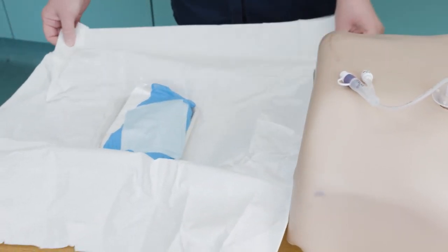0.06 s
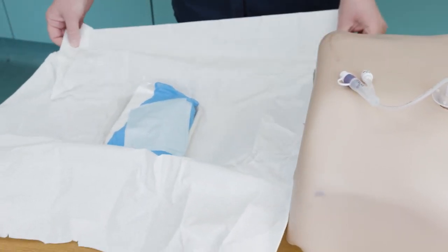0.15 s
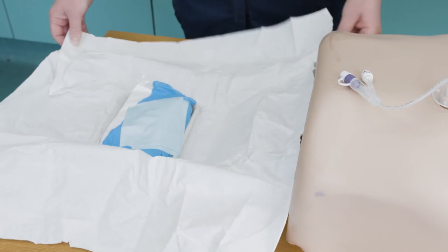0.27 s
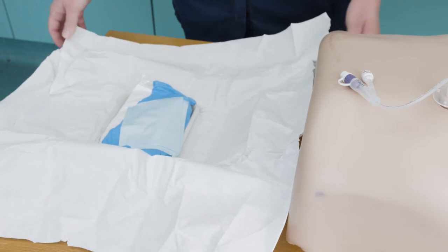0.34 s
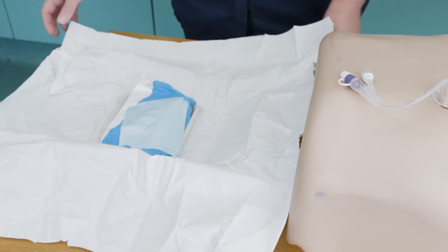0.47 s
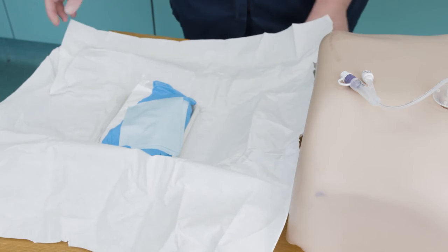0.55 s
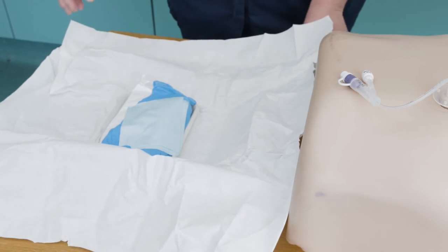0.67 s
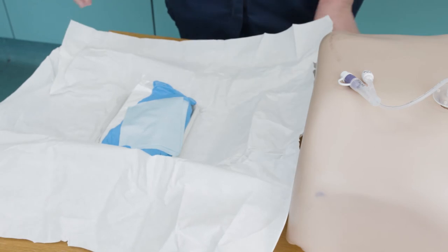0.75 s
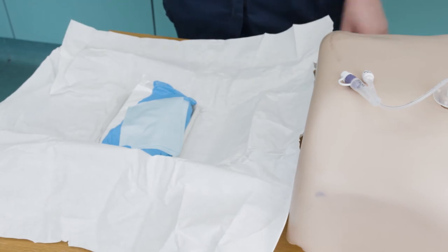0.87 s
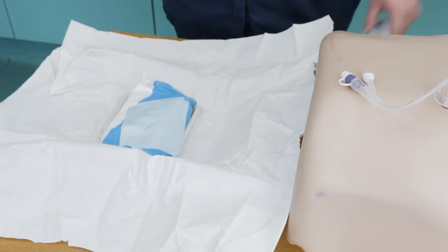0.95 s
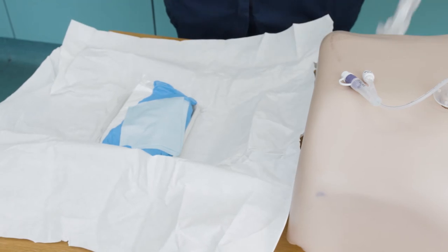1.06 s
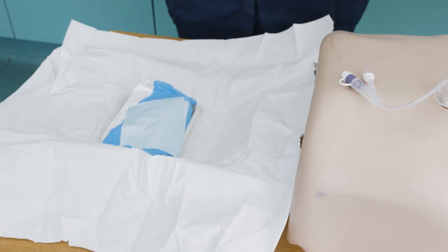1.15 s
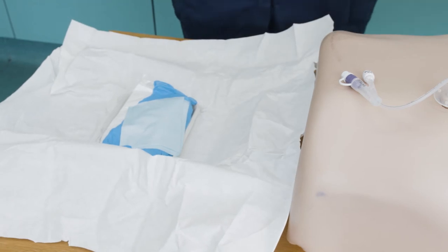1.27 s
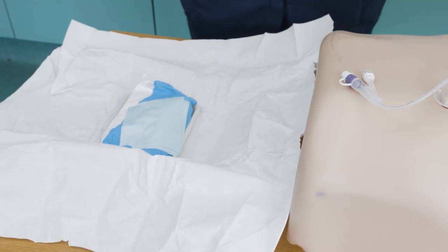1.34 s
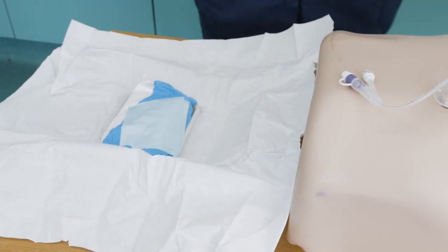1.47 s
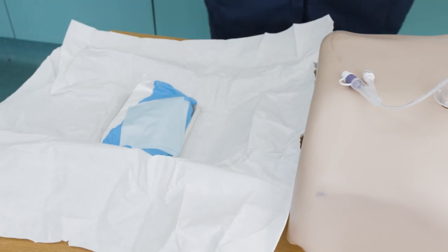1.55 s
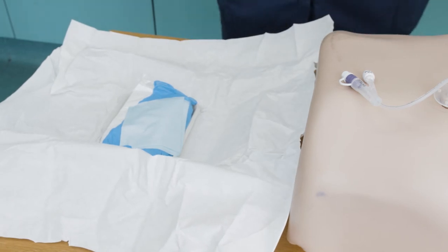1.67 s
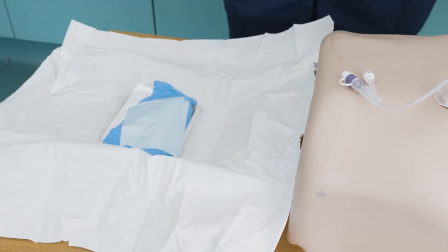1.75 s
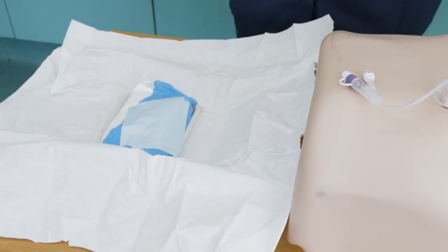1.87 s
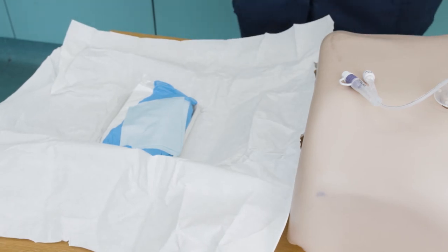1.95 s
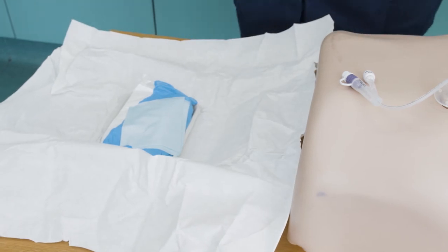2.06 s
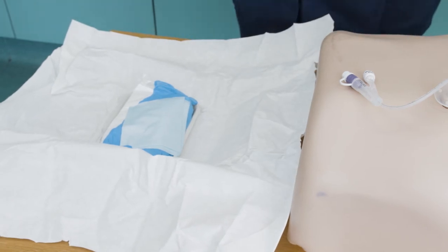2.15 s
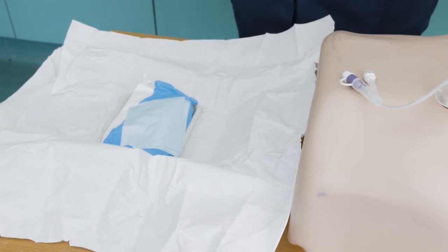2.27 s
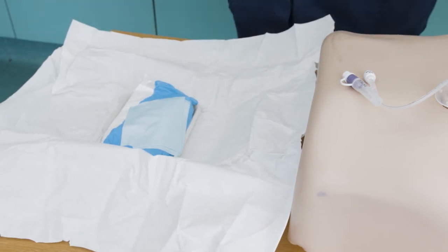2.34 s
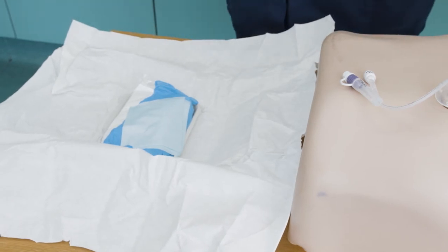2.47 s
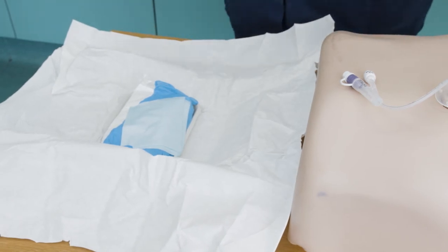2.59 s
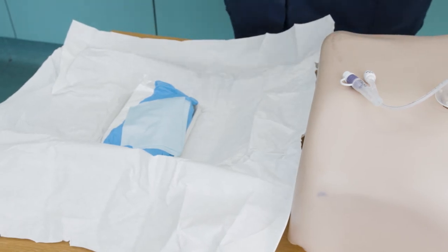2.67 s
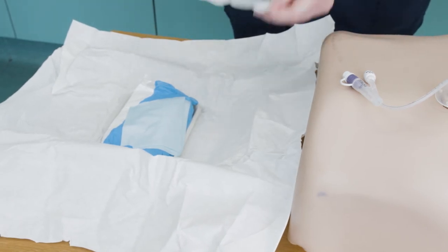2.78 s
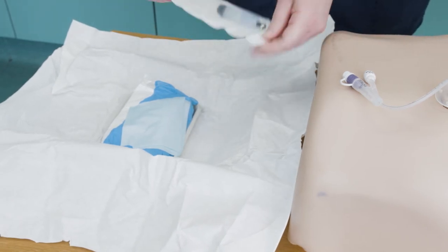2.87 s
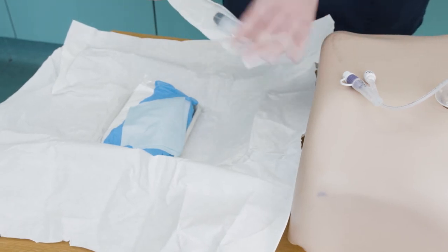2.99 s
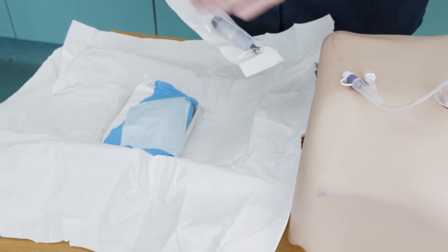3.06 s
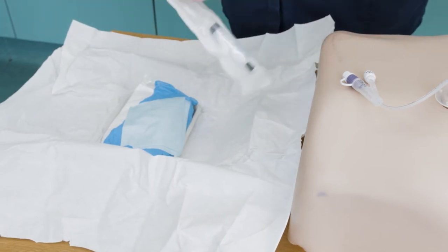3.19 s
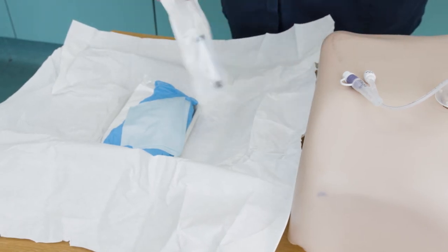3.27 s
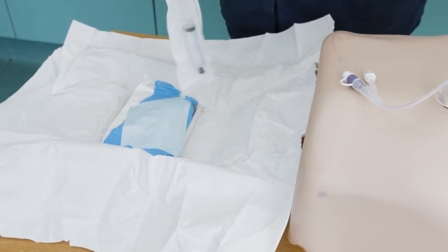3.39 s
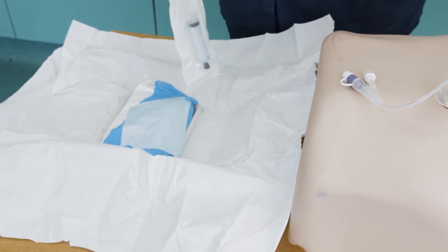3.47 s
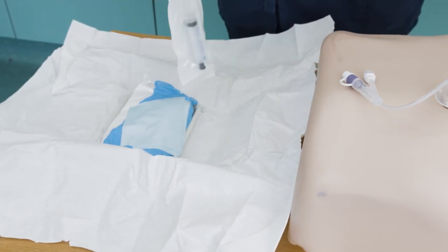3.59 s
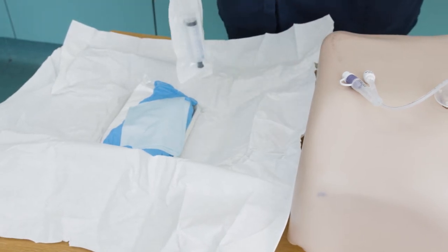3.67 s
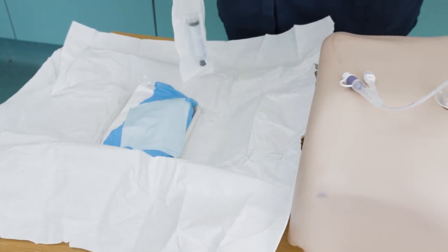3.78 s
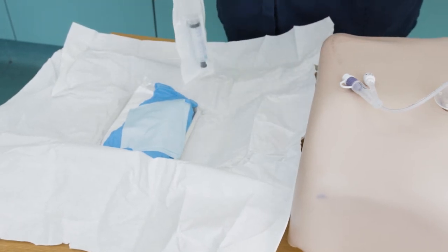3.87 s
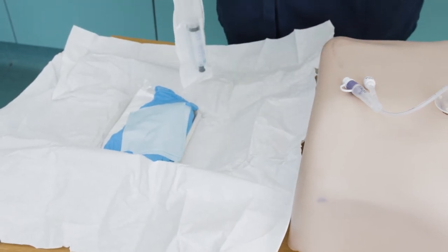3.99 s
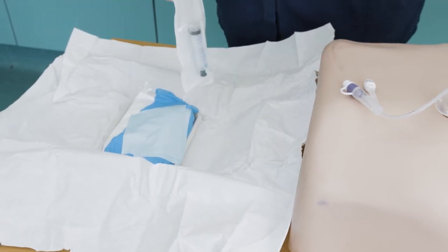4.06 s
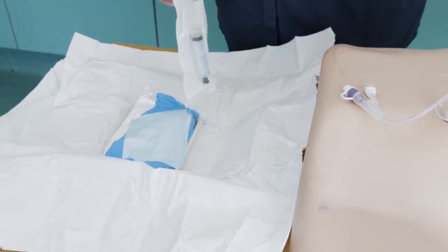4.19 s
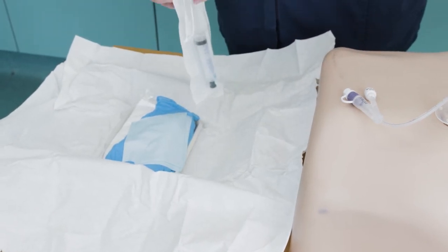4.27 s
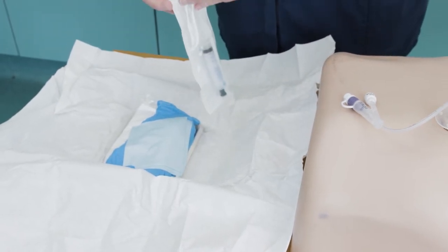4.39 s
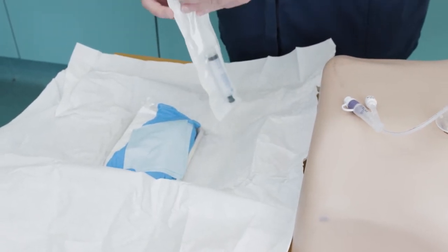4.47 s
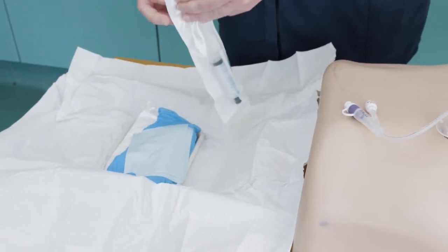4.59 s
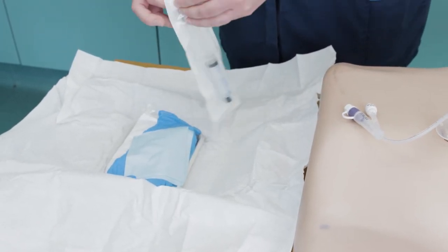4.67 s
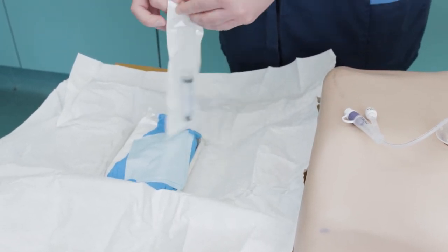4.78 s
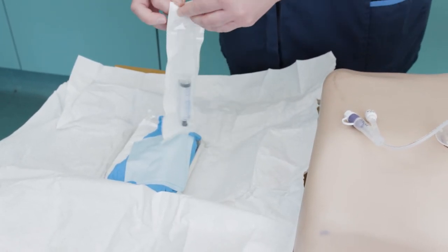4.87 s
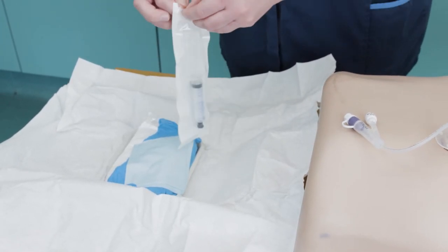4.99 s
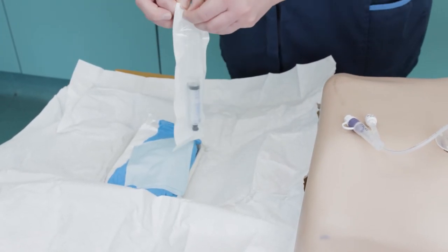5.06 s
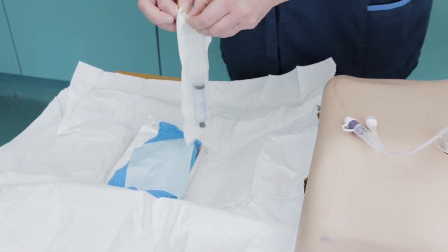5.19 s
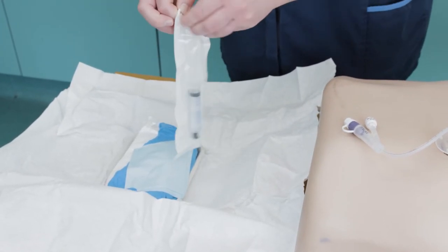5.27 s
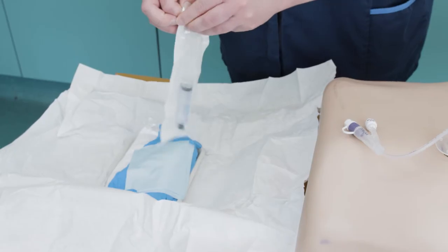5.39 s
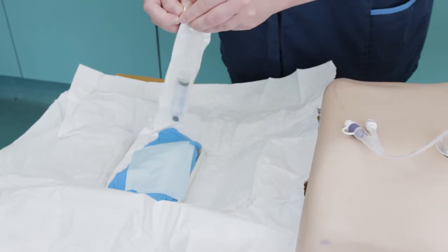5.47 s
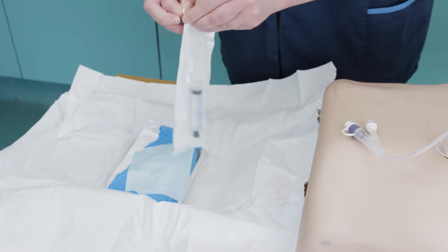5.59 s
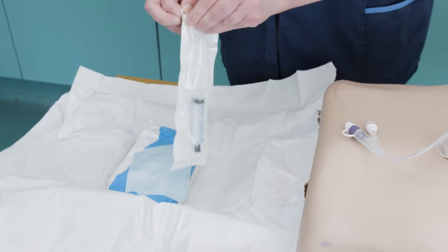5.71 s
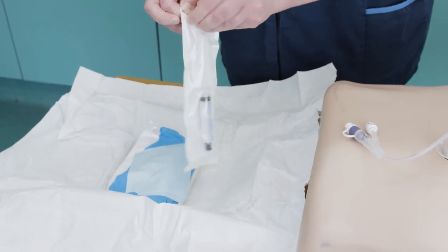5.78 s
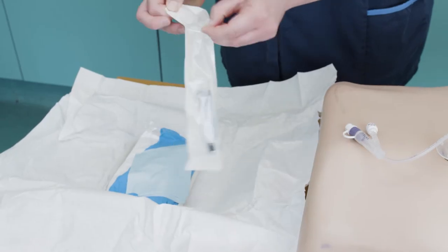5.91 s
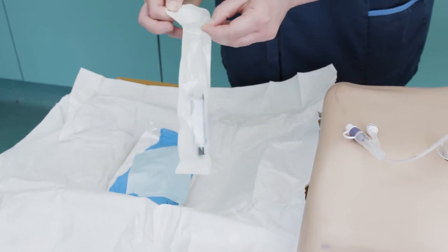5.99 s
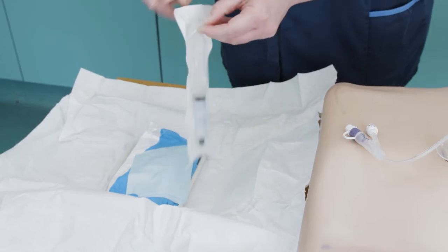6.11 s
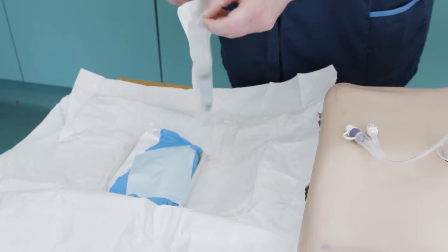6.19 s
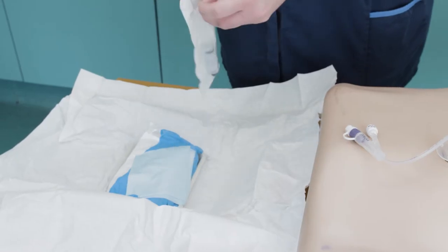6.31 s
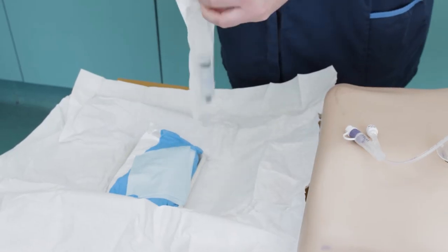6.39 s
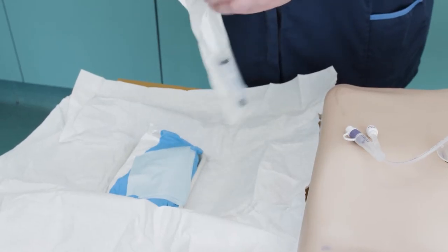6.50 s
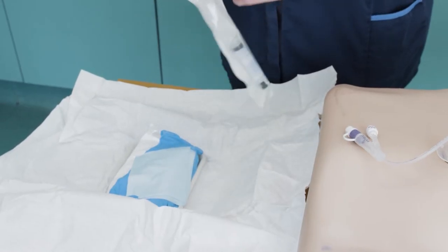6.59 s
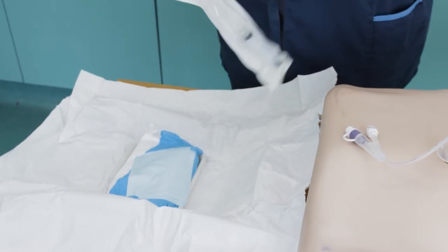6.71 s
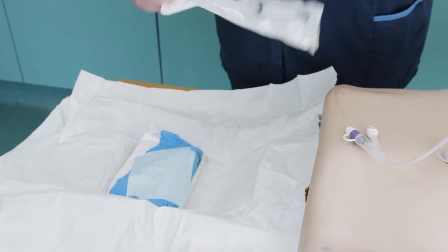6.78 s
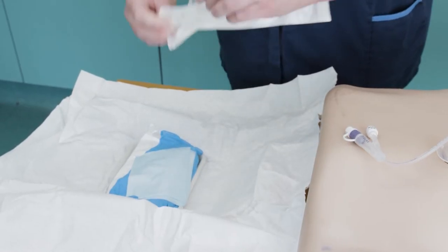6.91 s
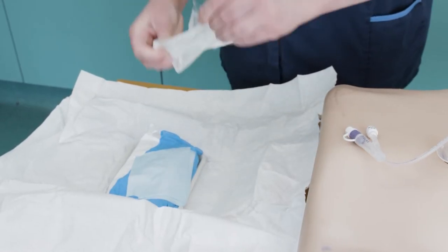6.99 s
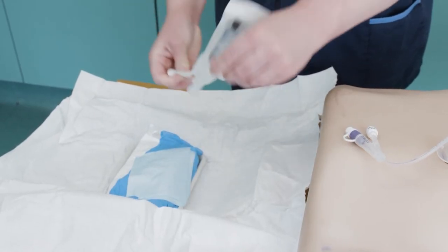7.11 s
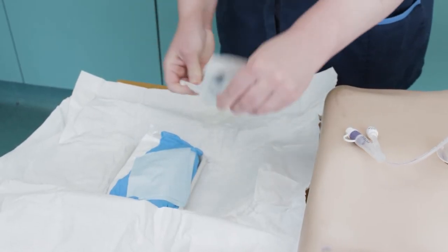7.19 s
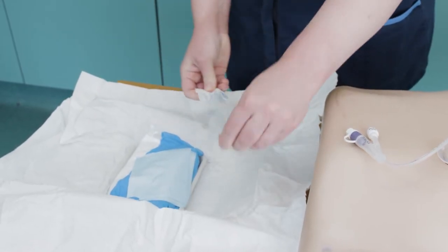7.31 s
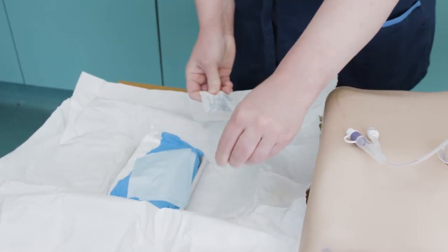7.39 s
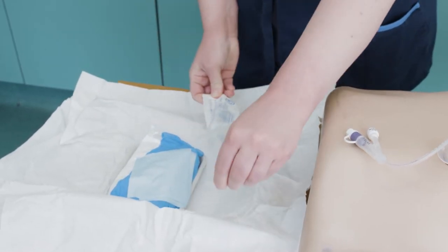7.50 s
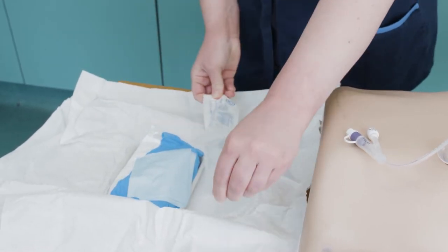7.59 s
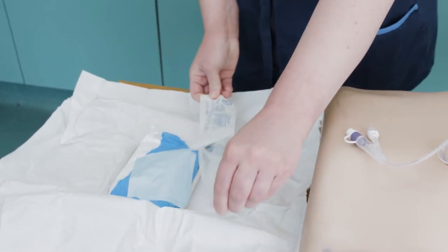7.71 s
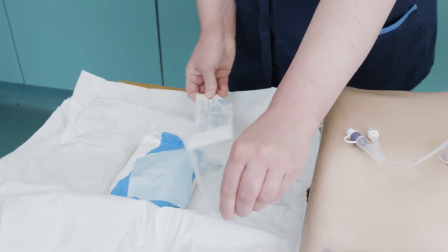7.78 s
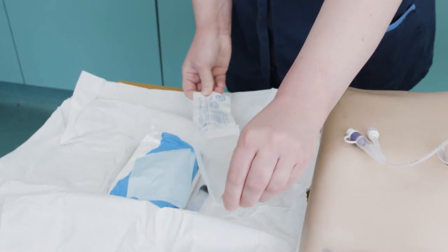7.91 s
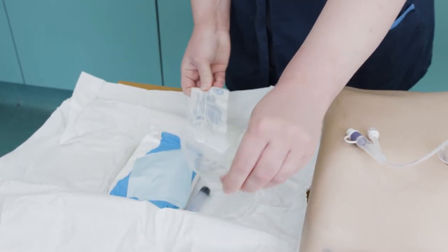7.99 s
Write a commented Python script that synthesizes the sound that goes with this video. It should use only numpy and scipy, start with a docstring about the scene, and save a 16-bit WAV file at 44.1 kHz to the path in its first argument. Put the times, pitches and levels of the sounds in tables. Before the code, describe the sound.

A paper sheet rustles and bumps softly as it is laid on a table. Scattered light crackles follow as a paper-and-plastic pouch is picked up and turned, growing busier under the fingers. The seal peels apart with a brief rasping squeak and louder crinkling, and a plastic syringe drops onto the covered table with a small knock. It sounds close, in a small room with faint ventilation.

```python
"""Peeling open a syringe pouch.

Hands lay down a paper wrap, then turn, pinch and peel open a paper-and-film pouch over a table
in a small hard room. Creases snap one by one over a rustle of tiny buckles. The seal sings as
its glue slips, and a plastic syringe drops on the table."""
import sys
import numpy as np
from scipy import signal
from scipy.fft import rfft, irfft, next_fast_len
from scipy.io import wavfile
from scipy.ndimage import uniform_filter1d, map_coordinates

SR = 44100
rng = np.random.default_rng(int(sys.argv[2]) if len(sys.argv) > 2 else 0)


def to_wav(sig):
    """Store sig (one row per channel, or 1-D mono) as 16-bit WAV at the path in sys.argv[1].

    Samples outside -1..1 are clipped; the rate is SR.
    """
    pcm = np.clip(np.atleast_2d(sig), -1, 1) * 32767
    pcm = np.round(pcm).astype(np.int16)
    wavfile.write(sys.argv[1], SR, pcm.T)  # frames by channels


N = 355005


def amp(db):
    """dB to gain."""
    return 10 ** (np.asarray(db) / 20)


def unit(x):
    """Each row at rms 1."""
    return x / np.sqrt(np.mean(x ** 2, axis=-1, keepdims=True) + 1e-20)


def along(points, hz):
    """Interpolate (Hz, value) points on a log axis."""
    f, values = np.transpose(points)
    return np.interp(np.log(hz + 1), np.log(f + 1), values)


def curves(rows):
    """One value per sample for each column after the time."""
    time_s, *columns = np.transpose(rows)
    return [np.interp(np.arange(N) / SR, time_s, column) for column in columns]


def wobble(knots_per_s):
    """Smooth random curve."""
    knots = rng.standard_normal(int(N * knots_per_s / SR) + 4)
    return map_coordinates(knots, [np.arange(N) * knots_per_s / SR])


def filtered(x, response):
    """Apply a gain given as a function of Hz."""
    size = next_fast_len(x.shape[-1] + 4096)
    return irfft(rfft(x, size) * response(np.fft.rfftfreq(size, 1 / SR)), size)[..., :x.shape[-1]]


def shaped(x, spectrum):
    """Filter by (Hz, dB) points; rms 1."""
    return unit(filtered(x, lambda f: amp(along(spectrum, f))))


def resonate(x, hz, width_hz):
    """Two passes through a causal resonance; rms 1."""
    return unit(filtered(x, lambda f: (1j * f * width_hz / (hz ** 2 - f ** 2 + 1j * f * width_hz)) ** 2))


def place(start_s, sounds):
    """Sum short sounds at their times."""
    at = np.round(np.asarray(start_s) * SR).astype(int)[:, None] + np.arange(sounds.shape[1])
    return np.bincount(at.ravel(), sounds.ravel(), N + sounds.shape[1])[:N]


def air():
    """Steady ventilation and microphone hiss."""
    # Each row: frequency in Hz, relative density in dB.
    spectrum = [(28, -6), (40, 2.5), (62, -8), (105, 0.5), (161, -6.5), (215, -1.5), (300, -5.5),
                (450, -9.5), (600, -9.5), (772, -25), (1440, -52), (4500, -29), (8000, -33), (15900, -43)]
    return amp(-58.5) * shaped(rng.standard_normal(N), spectrum)


def room(x):
    """Diffuse wall reflections: each band's power dies at its own rate, carried by fresh noise."""
    # Each row: frequency in Hz, T60 in seconds.
    walls = [(200, 0.38), (1500, 0.084), (6000, 0.15), (14000, 0.18)]
    hz, frame_s, bands = signal.stft(x, SR, nperseg=128)
    power = uniform_filter1d(abs(bands) ** 2, size=3, axis=0)
    feedback = amp(-120 * frame_s[1] / along(walls, hz))
    linger = np.array([signal.lfilter([0, 1 - k], [1, -k], p) for k, p in zip(feedback, power)])
    noise = signal.stft(rng.standard_normal(N), SR, nperseg=128)[2]
    noise /= np.sqrt(np.mean(abs(noise) ** 2))
    wet = signal.istft(np.sqrt(linger) * noise, SR, nperseg=128)[1]
    return np.pad(wet, (130, 0))[:N]


def thumps():
    """Soft bumps of hand and pack: short, dull booms."""
    # Each row: start in seconds, level in dB, centre in Hz.
    bumps = [(.146, -37, 616), (0.751, -42.5, 386), (3.372, -41.5, 600), (5.33, -43, 620),
             (5.932, -67, 575), (6.514, -48.5, 350)]
    start_s, level_db, hz = np.array(bumps).T[:, :, None]
    rise_s, t60_s = 0.00052, 0.14
    t = np.arange(SR // 8) / SR
    boom = resonate(rng.standard_normal((len(start_s), len(t))), hz, 1.13 * hz)
    return place(start_s, amp(level_db - 60 * t / t60_s) * boom * (1 - np.exp(-t / rise_s)))


def buckles(base_per_s, spread_db, life_s):
    """Tiny buckles: sudden noise bursts of unequal size, clumped in time."""
    starts = rng.random(N) < base_per_s / SR * amp(4 * wobble(25))
    kicks = starts * amp(spread_db * rng.exponential(size=N).clip(max=3))
    power = signal.lfilter([1], [1, -np.exp(-1 / (life_s * SR))], kicks ** 2)
    local_mean = uniform_filter1d(power, SR // 16).clip(1e-9)
    return np.sqrt(power / local_mean + 0.31) * rng.standard_normal(N)


def crunches():
    """A sheet flaps, crumples or is brushed: one dense swell of buckles per stroke."""
    # Each row: crest in seconds, level in dB, centre in Hz, Gaussian sigma in seconds.
    strokes = [(0.107, -49, 173, 0.052), (0.107, -35.5, 1800, 0.021), (0.538, -53, 2000, 0.0047),
               (3.874, -54, 900, 0.014), (7.25, -53, 305, 0.055), (7.271, -38.5, 754, 0.0086),
               (7.473, -42.5, 890, 0.013)]
    t = np.arange(N) / SR
    sound = np.zeros(N)
    for crest_s, level_db, hz, sigma_s in strokes:
        swell = amp(level_db) * np.exp(-((t - crest_s) / sigma_s) ** 2 / 2)
        sound += swell * resonate(buckles(590, spread_db=5, life_s=0.00032), hz, 1.1 * hz)
    return sound


def squeeze_db():
    """Finger work on the film: each squeeze rises fast and fades at its own pace."""
    # Each row: peak time in seconds, level in dB, release in dB per second.
    squeezes = [(.005, -51, 90), (.06, -43.5, 149.5), (0.107, -38, 200), (.264, -57, 119.5),
                (0.344, -58, 329.5), (0.702, -52, 59.5), (0.982, -58.5, 45.5), (1.202, -60.5, 41.5),
                (1.422, -49.5, 81.5), (1.732, -56, 64.5), (1.847, -56, 89.5), (2.001, -63, 248.5),
                (2.243, -48, 279), (2.36, -60.5, 301.5), (2.577, -57.5, 30.5), (2.772, -56.5, 32),
                (2.857, -47, 127), (3.173, -65.5, 61), (3.256, -45, 198.5), (3.38, -44.5, 130.5),
                (3.585, -59.5, 100), (3.809, -58.5, 125.5), (3.973, -60.5, 109.5), (4.089, -58, 101.5),
                (4.43, -58, 48.5), (4.669, -55, 79), (4.756, -54.5, 22.5), (5.121, -57, 77.5),
                (5.305, -52.5, 59), (5.332, -39, 173.5), (5.49, -52, 41.5), (5.561, -50, 163.5),
                (5.713, -50.5, 152), (5.875, -44, 59.5), (5.928, -29, 239.5), (6.106, -41.5, 209),
                (6.235, -57, 19), (6.379, -43, 300.5), (6.47, -48, 60), (6.531, -45, 332),
                (6.614, -50.5, 49.5), (6.759, -47.5, 61), (6.811, -32.5, 100.5), (6.965, -38.5, 60.5),
                (7.011, -31, 46.5), (7.16, -39.5, 70), (7.402, -37, 170), (7.508, -39.5, 40),
                (7.583, -34.5, 44.5), (7.9, -48.5, 40.5)]
    peak_s, level_db, release_db_per_s = np.array(squeezes).T[:, :, None]
    press_db_per_s = 619
    t = np.arange(0, N, 32) / SR
    each_db = level_db - np.where(t < peak_s, press_db_per_s * (peak_s - t), release_db_per_s * (t - peak_s))
    power = np.sum(amp(2 * each_db), axis=0) + amp(2 * HELD_DB)
    return np.interp(np.arange(N) / SR, t, 10 * np.log10(power))


def rustle():
    """Film and paper buckle finely under the fingers; the paper also slides and flexes."""
    # Each row: frequency in Hz, relative density in dB.
    film_spectrum = [(530, -34), (900, -11), (1620, -1.5), (2160, 1.5), (3810, 1), (4400, 3.5), (5520, -2),
                     (13300, -13.5), (15900, -15)]
    paper_spectrum = [(88, -44), (150, -20.5), (354, -0.5), (413, 9), (516, 5.5), (867, 8), (2500, -2.5),
                      (3250, -25), (5500, -120)]
    # Each row: time in seconds, sliding level in dB.
    slide = [(0, -46.5), (.18, -58.5), (.36, -52.5), (.42, -68.5), (4.4, -66.5), (6.73, -63), (6.93, -46),
             (7.85, -43.5), (8.05, -47)]
    film = shaped(buckles(540, spread_db=7.5, life_s=0.0015), film_spectrum)
    paper = shaped(buckles(170, spread_db=5, life_s=0.0079), paper_spectrum)
    press = amp(squeeze_db())
    paper_gain = np.hypot(amp(curves(slide)[0]), press * amp(-11.5))
    return press * film + paper_gain * paper


def syringe_drop():
    """The hollow barrel knocks the table through the paper: their modes and a dull rattle."""
    # Each row: start in seconds, gain in dB.
    landings = [(7.928, -22)]
    # Each row: frequency in Hz, relative level in dB, T60 in seconds.
    modes = [(145, -14, 0.3), (209, -7.5, 0.16), (316, -11, 0.13), (402, 1, 0.069), (658, 3.5, 0.084),
             (782, 1, 0.087), (960, -19, .1), (1355, 12.5, 0.019), (1546, 4.5, 0.063), (1800, 2.5, 0.059),
             (2160, 3.5, 0.053)]
    rise_s, rattle_t60_s = 0.0022, 0.28
    t = np.arange(SR // 4) / SR
    ring = sum(amp(db + rng.normal(0, 0.98) - 60 * t / t60_s) * np.sin(2 * np.pi * hz * t)
               for hz, db, t60_s in modes)
    rattle = resonate(rng.standard_normal(len(t)), 530, 1300) * amp(-2 - 60 * t / rattle_t60_s)
    start_s, gain_db = np.transpose(landings)
    return place(start_s, amp(gain_db)[:, None] * (ring + rattle) * (1 - np.exp(-t / rise_s)))


def peel():
    """The glue lets go in quick slips; the taut strip rings at a pitch that follows its tension."""
    # Three pulls. Each row: time in seconds, level in dB, pitch in Hz.
    pulls = [(6.76, -52, 1603), (6.815, -29.5, 1600), (6.84, -39, 1400), (6.866, -28.5, 1325),
             (6.89, -62, 1350), (6.955, -44, 2200), (6.995, -26.5, 2904), (7.03, -28, 2800),
             (7.07, -32, 2100), (7.11, -38, 1600), (7.155, -39, 1750), (7.22, -56, 1500), (7.49, -48, 1800),
             (7.53, -37, 1800), (7.61, -38.5, 2050), (7.72, -65, 1900)]
    level_db, pitch_hz = curves(pulls)
    half_width_hz = 356
    t = np.arange(N) / SR
    peeling = (t > pulls[0][0]) & (t < pulls[-1][0])
    phase = 2 * np.pi * np.cumsum(pitch_hz * (1 + 0.13 * wobble(120))) / SR
    slips = np.array([buckles(300, spread_db=5, life_s=0.0066) for _ in range(2)])
    # Narrow noise band around the moving pitch.
    sway = filtered(slips, lambda f: 1 / (1 + (f / half_width_hz) ** 2))
    return peeling * amp(level_db) * unit(sway[0] * np.cos(phase) + sway[1] * np.sin(phase))


def small_snaps(count):
    """Random crease rows for snaps(): more and stronger under a harder squeeze."""
    press_db = squeeze_db()
    scatter = rng.standard_normal((count, 5))
    effort = np.cumsum(press_db - HELD_DB)
    share = (np.arange(count) + (1 + np.tanh(scatter[:, 4])) / 2) / count
    at = np.searchsorted(effort, share * effort[-1]).clip(0, N - 1)
    level_db = press_db[at] + 8 + 3 * scatter[:, 0]
    ring_hz = 3800 * 2 ** (0.39 * scatter[:, 1])
    body_db, edge_db = -23 + 4 * scatter[:, 2], -19 + 4 * scatter[:, 3]
    return np.c_[at / SR, level_db, ring_hz, body_db, edge_db]


def snaps():
    """A crease buckles: a sharp jolt, a fast-dying burst and a short ring of the panel beside it."""
    # Each row: start in seconds, gain in dB, ring in Hz, body trim in dB, treble edge trim in dB.
    creases = [(0.015, -33, 1490, -16, -19), (0.0283, -24, 2630, -18.5, -27), (0.0478, -28, 1530, -16, -21),
               (0.0835, -21, 4410, -13, -26), (0.1451, -15, 3360, -24, -23),
               (0.2414, -30, 1380, -13.5, -39), (0.2596, -33.5, 1480, -5.5, -37),
               (0.2874, -37, 1850, -5.5, -32), (0.3162, -33, 4070, -9.5, -29), (0.6677, -45, 1750, -8, -24),
               (0.6822, -27.5, 3260, -20.5, -35), (0.7532, -31, 3770, -14.5, -19),
               (0.9605, -26, 2550, -30, -38), (1.1138, -27, 5700, -28, -15), (1.19, -30.5, 3530, -22, -44),
               (1.409, -37.5, 1950, -6.5, -32), (1.481, -23, 4600, -20, -21), (1.7163, -35, 1400, -16, -23),
               (1.8072, -33.5, 4230, -17.5, -21), (1.8293, -17, 4070, -20.5, -12.5),
               (1.8713, -30, 4130, -20, -29), (2.2281, -27, 4550, -24, -22),
               (2.2503, -40.5, 2580, -11, -26), (2.5396, -36.5, 2850, -15, -15),
               (2.5642, -25, 2330, -20, -12), (2.6986, -18, 2400, -28, -45), (2.7244, -28, 2360, -30, -23),
               (2.7382, -25.5, 3990, -29, -30), (2.7777, -24.5, 3810, -14.5, -20),
               (2.8002, -25, 3780, -21, -16), (2.8067, -21.5, 6360, -25, -19), (2.84, -24, 3750, -28, -14),
               (2.8475, -18, 4200, -22.5, -26), (2.8554, -16.5, 7700, -23, -24),
               (2.8932, -26, 4770, -25, -28), (2.973, -29, 4430, -18.5, -36), (3.24, -25, 1800, -22, -34),
               (3.272, -25, 4760, -18, -24), (3.2857, -23, 3570, -22, -27.5),
               (3.3384, -12, 2470, -27.5, -25), (3.3611, -20, 2380, -22, -19),
               (3.3799, -15, 3450, -23.5, -13), (3.3924, -19.5, 5680, -22, -28),
               (3.5296, -36, 4230, -23, -14), (3.5608, -23.5, 3860, -20, -12.5),
               (3.5907, -22, 2320, -22.5, -12), (3.7901, -30.5, 4170, -17, -34),
               (3.8092, -20, 3820, -24, -47), (3.957, -20, 4160, -21, -30.5),
               (3.9664, -23.5, 4340, -16.5, -33), (4.0715, -31, 2390, -19.5, -22),
               (4.3112, -35.5, 4100, -38, -28), (4.3408, -33.5, 3320, -30, -31),
               (4.385, -25.5, 3800, -34, -18), (4.4032, -32, 2620, -22, -16), (4.4254, -23, 6060, -26, -9),
               (4.4784, -35, 4260, -19, -18), (4.5481, -26.5, 3400, -26, -40),
               (4.5941, -24, 1980, -12.5, -28), (4.6292, -32.5, 3980, -17, -40),
               (4.6793, -31.5, 2190, -12, -23), (4.7447, -21, 3580, -21.5, -15),
               (4.81, -20, 2400, -18, -30), (4.8307, -28, 2350, -32, -17), (4.8614, -27, 3480, -20.5, -34),
               (4.9346, -29.5, 2500, -27, -34), (4.9931, -26.5, 7550, -34, -15),
               (5.0488, -26, 3320, -19, -36), (5.1088, -24.5, 3270, -23, -15.5),
               (5.1223, -27.5, 6030, -41, -10.5), (5.1372, -19.5, 5100, -46, -13),
               (5.169, -24.5, 4440, -23, -21), (5.182, -27, 2750, -17.5, -14),
               (5.225, -36.5, 2800, -15, -54), (5.3024, -27, 4410, -23, -24),
               (5.3238, -15, 7200, -15.5, -20), (5.3312, -12.5, 4800, -21.5, -27),
               (5.3737, -30, 3440, -17, -24), (5.451, -26, 4340, -23, -32), (5.4794, -21, 2130, -33, -18),
               (5.4908, -24, 1900, -20.5, -25), (5.4983, -23.5, 3490, -26, -11),
               (5.5499, -24.5, 2380, -20, -20), (5.5593, -21.5, 3870, -24, -21),
               (5.57, -21.5, 2500, -36, -15), (5.7019, -19.5, 3270, -19, -27),
               (5.745, -22.5, 2660, -36, -34), (5.8595, -26.5, 6840, -23, -9),
               (5.8765, -20.5, 5000, -25, -22), (5.899, -14.5, 2560, -19, -15),
               (5.916, -14.5, 4450, -20.5, -15), (5.9328, -5, 2260, -46, -23),
               (5.9414, -9.5, 6410, -37, -22), (5.9463, -11.5, 3070, -31, -11),
               (5.9589, -23, 1920, -17, -23), (6.0424, -29.5, 4220, -21.5, -15),
               (6.0866, -23, 4200, -22, -19), (6.11, -23, 4580, -19, -12.5), (6.1405, -25, 3520, -32, -20),
               (6.1593, -20.5, 4210, -24, -24), (6.229, -18, 4200, -33, -37),
               (6.2642, -28.5, 4200, -38, -21), (6.3944, -27, 3890, -34, -15),
               (6.4581, -18.5, 2260, -21, -39), (6.4923, -21.5, 4300, -28, -21),
               (6.5113, -15, 2680, -28, -16.5), (6.5322, -22.5, 4530, -22.5, -21),
               (6.5999, -18.5, 4500, -28, -11), (6.729, -25.5, 2610, -22, -33),
               (6.754, -17, 2580, -21, -37), (6.7754, -19, 1940, -15.5, -21),
               (6.7993, -6.5, 2180, -31, -27), (6.844, -14, 1440, -16, -28), (6.871, -4, 1310, -25, -36),
               (6.962, -5, 2130, -25, -19.5), (6.9853, -8.5, 2350, -27, -19), (6.995, -7.5, 3100, -30, -22),
               (7.0211, -19, 2640, -24, -29), (7.1178, -19, 2440, -18, -10), (7.1694, -21, 4240, -27, -7),
               (7.188, -21, 1780, -30, -11), (7.284, -28, 1800, -21, -10), (7.3326, -22.5, 1720, -23, -16),
               (7.363, -22, 1620, -16, -9), (7.423, -21, 4150, -28, -15.5), (7.4791, -17.5, 6200, -18, -12),
               (7.4932, -20, 2520, -22, -14), (7.5107, -17.5, 8250, -27, -12),
               (7.521, -17.5, 1320, -18, -11), (7.5523, -17.5, 2150, -20, -10),
               (7.5976, -17, 2230, -32, -11), (7.6278, -18.5, 8200, -21, -8),
               (7.643, -18.5, 3000, -18, -6.5), (7.6712, -20, 2720, -22, -19),
               (7.6917, -14.5, 2840, -19, -16.5), (7.7445, -23, 8440, -25, -10),
               (7.7853, -8, 8000, -29, -20), (7.856, -19.5, 5150, -20, -11.5),
               (7.892, -14.5, 6400, -40, -25), (7.8988, -21, 4730, -14.5, -5.5),
               (7.9293, -3.5, 1520, -18, -22), (8.0454, -20.5, 5110, -31, -15)]
    start_s, gain_db, ring_hz, body_db, edge_db = np.r_[creases, small_snaps(count=50)].T[:, :, None]
    t = np.arange(1536) / SR
    hiss = rng.standard_normal((len(start_s), 4, len(t)))
    # The jolt stands out more in strong snaps.
    jolt = (t == t[8]) * amp(15 + 0.25 * gain_db) * np.sign(hiss[:, 0, :1])

    def burst(band, hz, width_hz, t60_s):
        """Jolt and dying noise in one band; rms 1."""
        tail = hiss[:, band] * amp(-60 * t / t60_s) * (1 - np.exp(-t / 0.00019))
        return resonate(jolt + tail, hz, width_hz)

    body = amp(body_db - 9) * burst(0, 1060, 2850, t60_s=0.056)
    broad = amp(-26.5) * burst(1, 3620, 4250, t60_s=0.017)
    ring = amp(-28) * burst(2, ring_hz, 0.3 * ring_hz, t60_s=0.017)
    edge = amp(edge_db - 11.5) * burst(3, 6530, 12000, t60_s=0.029)
    return place(start_s, amp(gain_db) * (body + broad + ring + edge))


def scene():
    """Sources, room and noise floor, mono; small thin things radiate no deep bass."""
    low_cut_hz = 85
    direct = snaps() + crunches() + thumps() + rustle() + peel() + syringe_drop()
    in_room = direct + amp(-10.5) * room(direct)
    return (filtered(in_room, lambda f: f ** 4 / (f ** 4 + low_cut_hz ** 4)) + air())[None]


def record(dry):
    """Brick-wall low-pass at 16 kHz."""
    return filtered(dry, lambda f: f < 16000)


HELD_DB = -80  # film level with the pouch merely held

dry = scene()
out = record(dry)
to_wav(out)
```